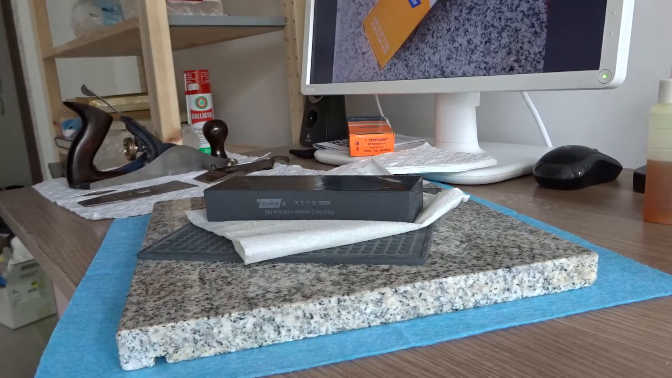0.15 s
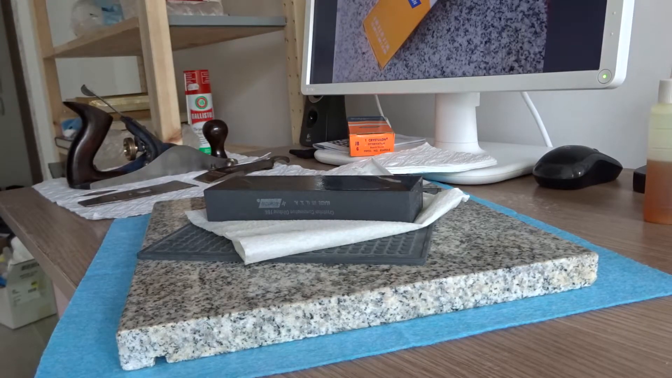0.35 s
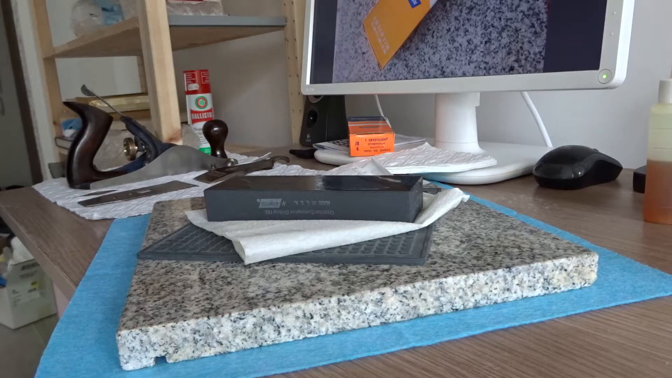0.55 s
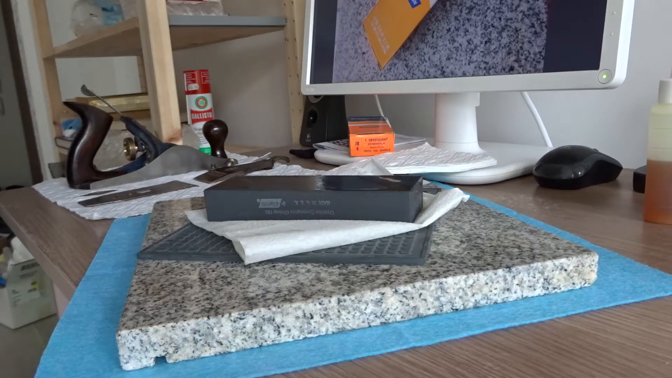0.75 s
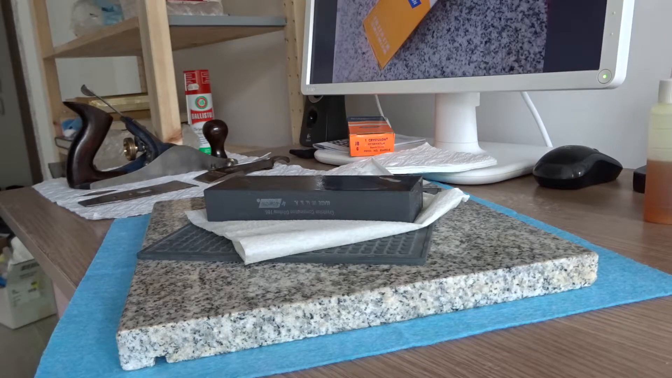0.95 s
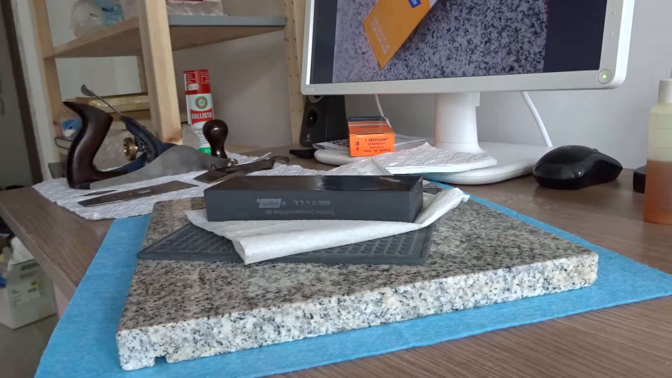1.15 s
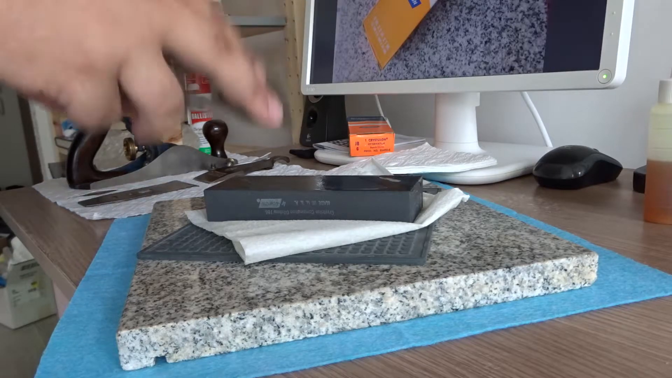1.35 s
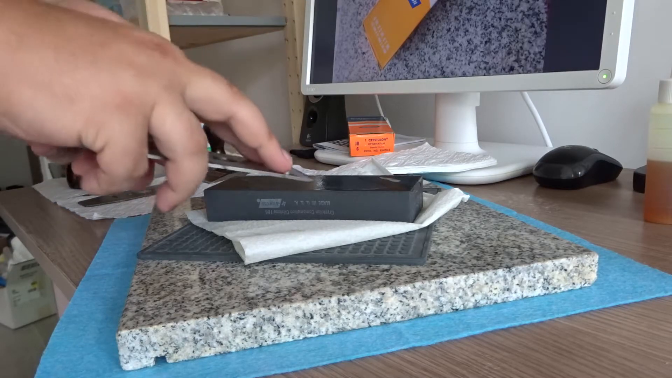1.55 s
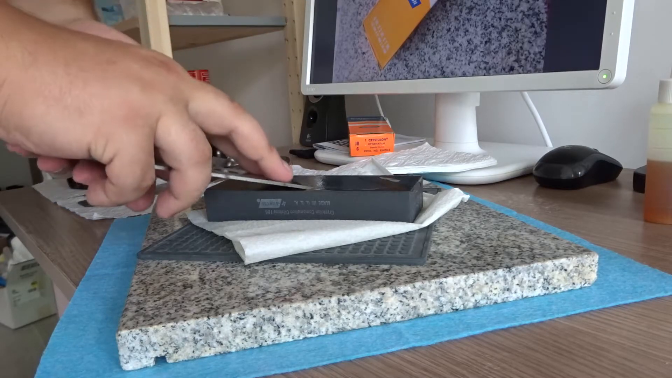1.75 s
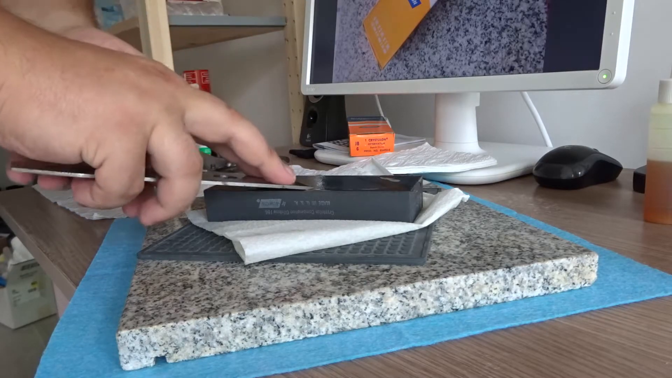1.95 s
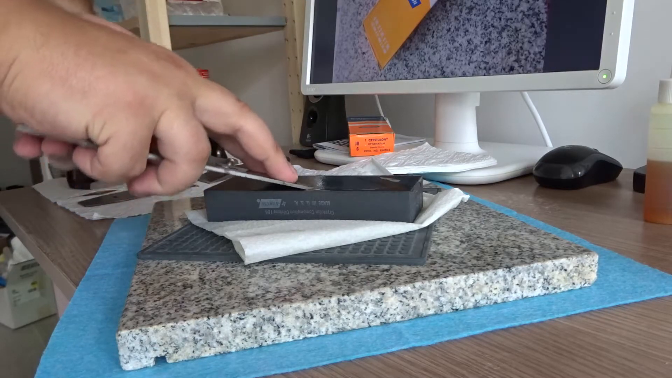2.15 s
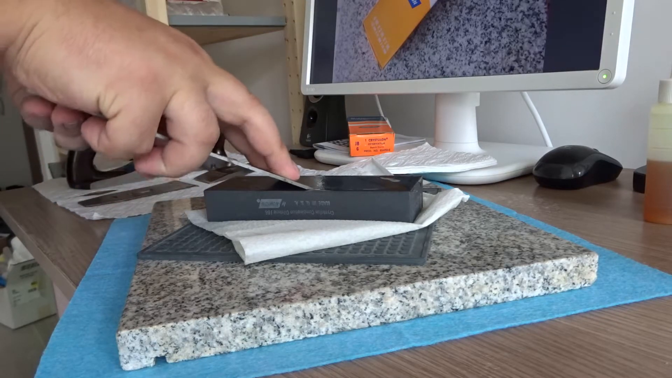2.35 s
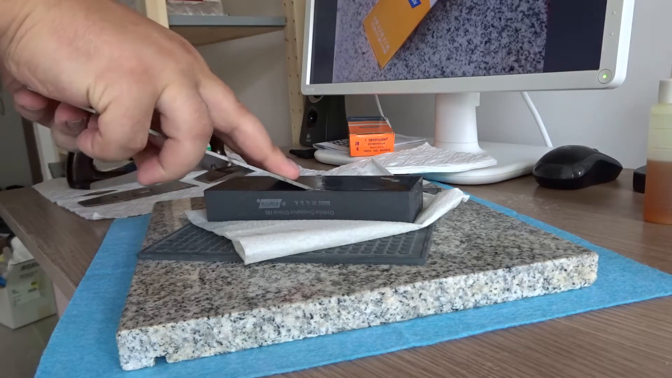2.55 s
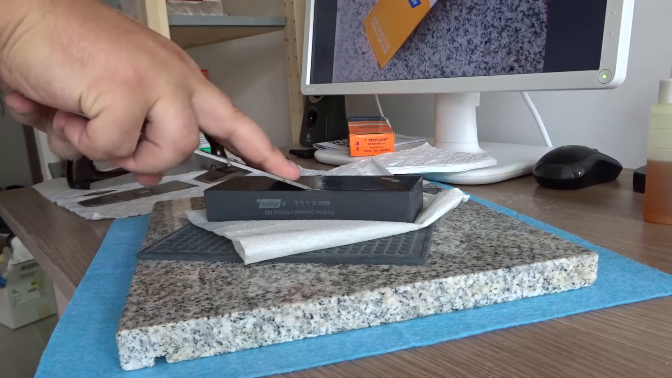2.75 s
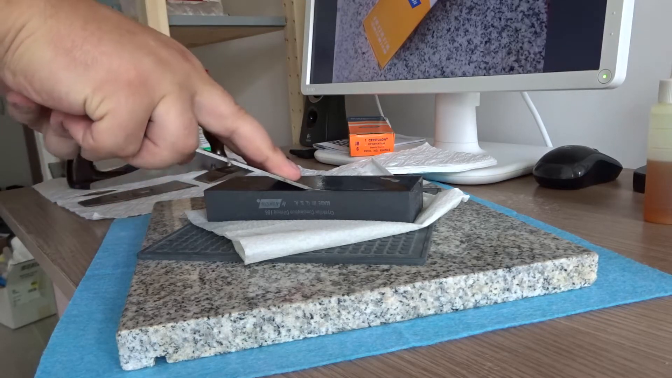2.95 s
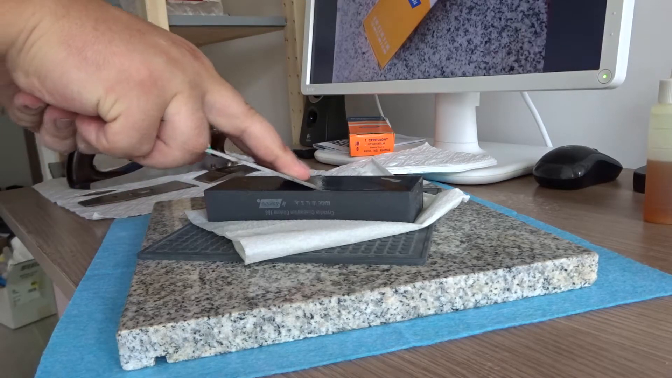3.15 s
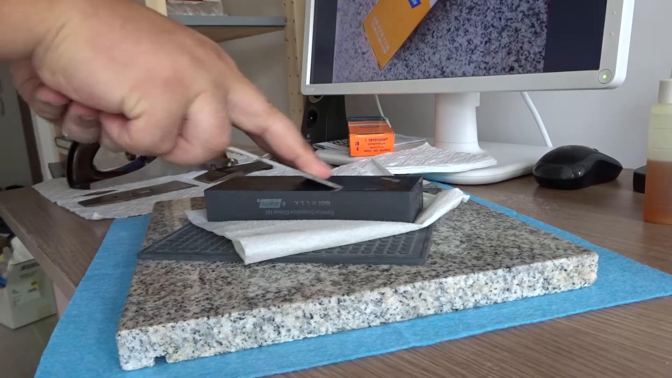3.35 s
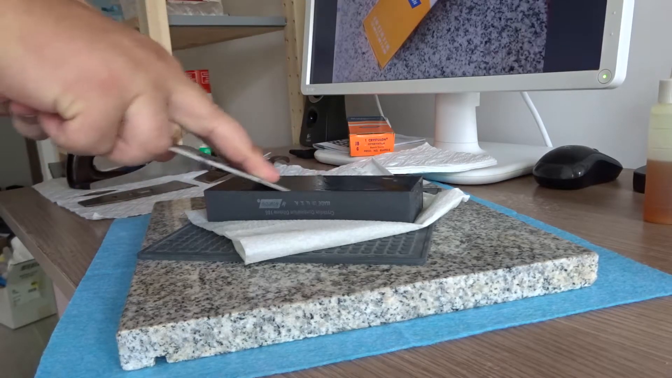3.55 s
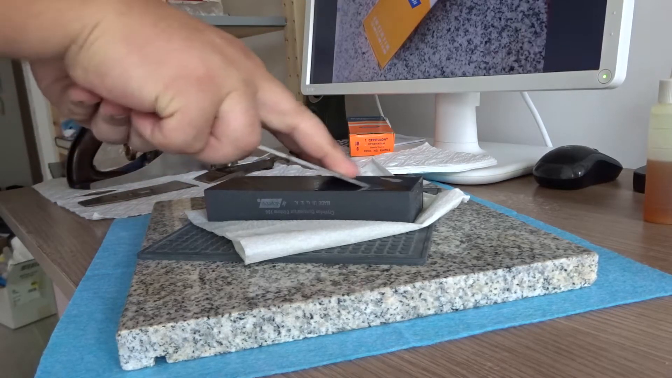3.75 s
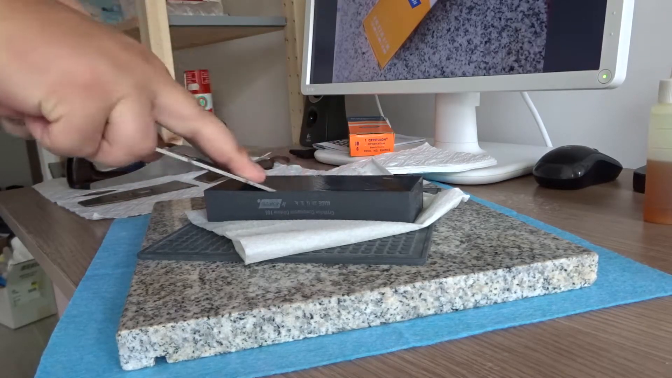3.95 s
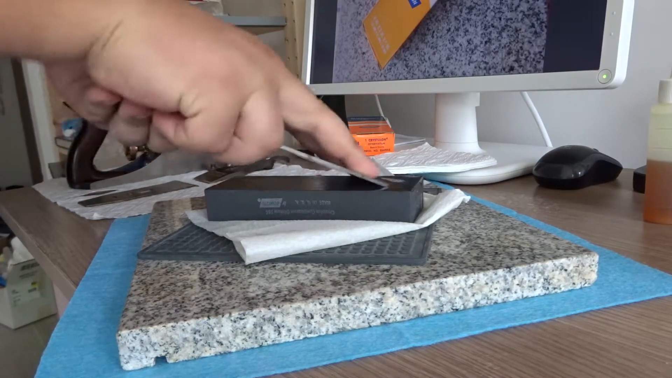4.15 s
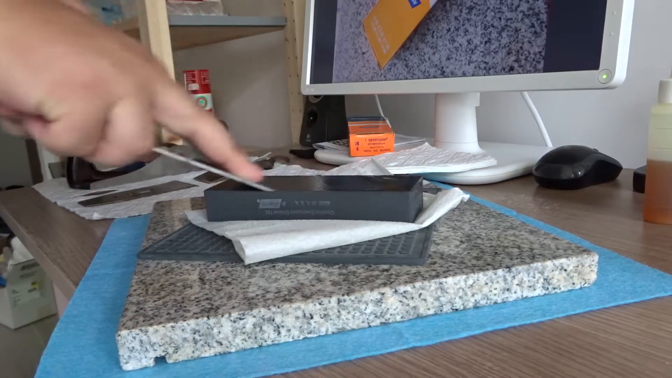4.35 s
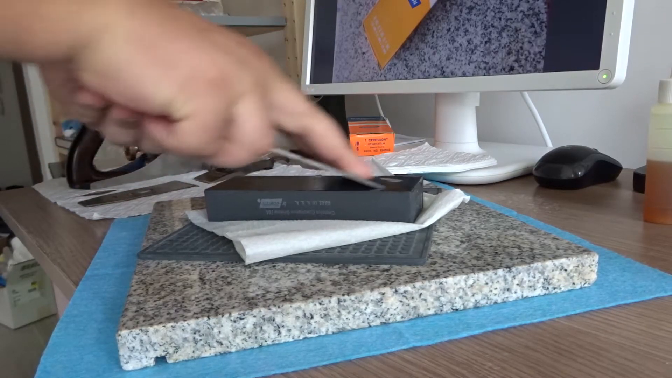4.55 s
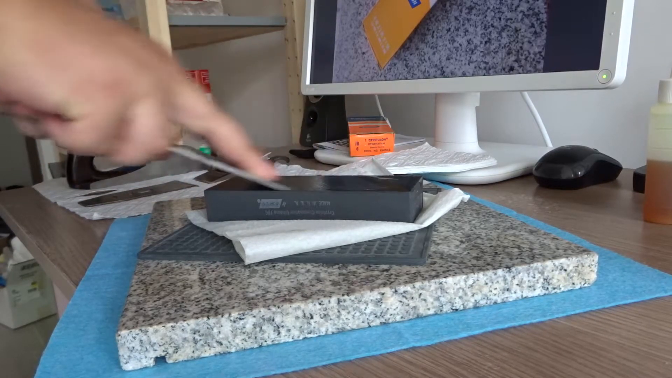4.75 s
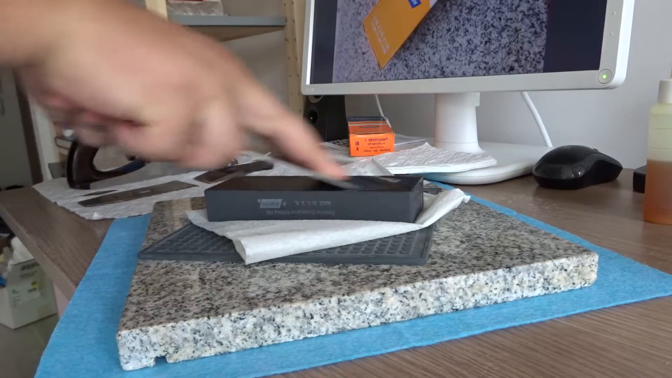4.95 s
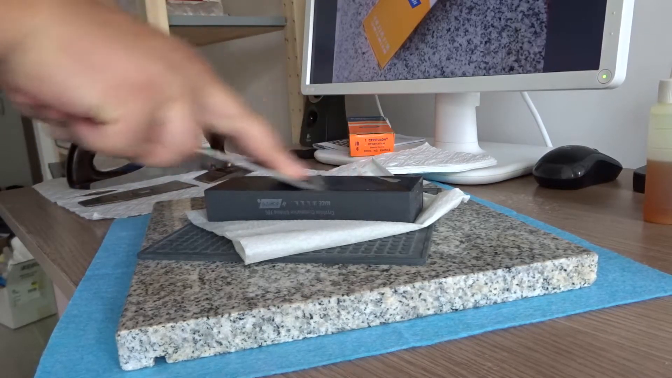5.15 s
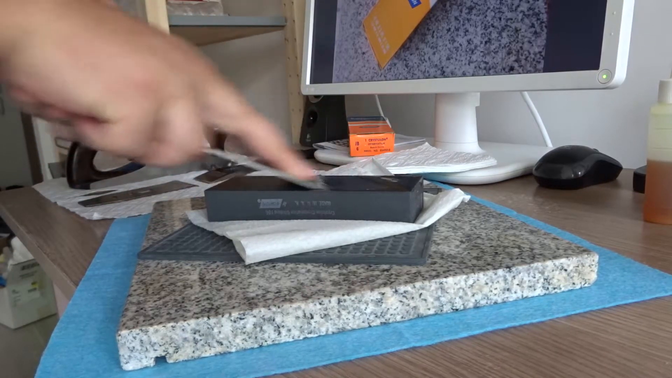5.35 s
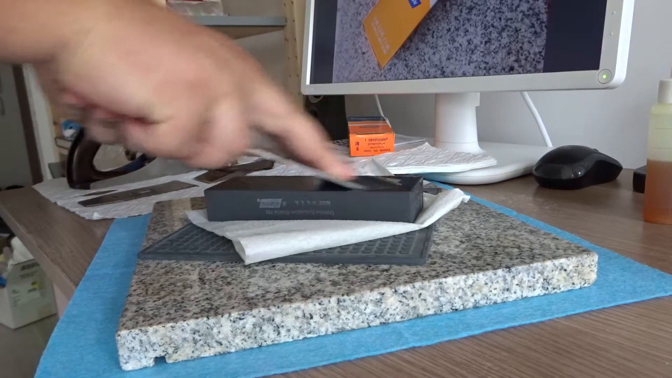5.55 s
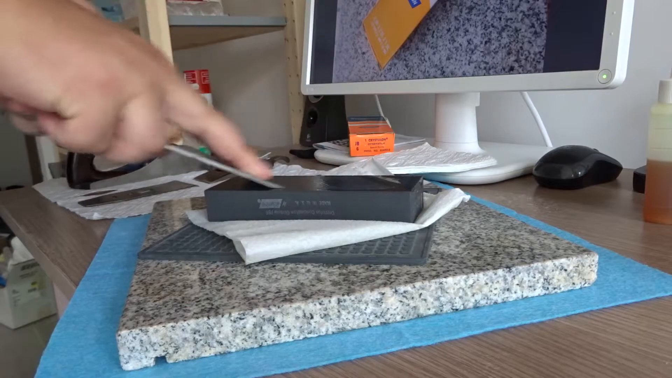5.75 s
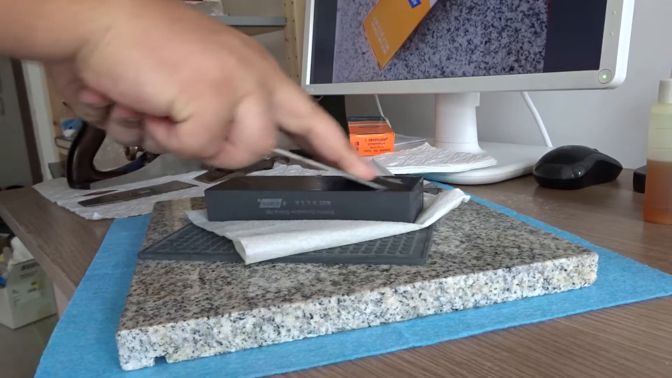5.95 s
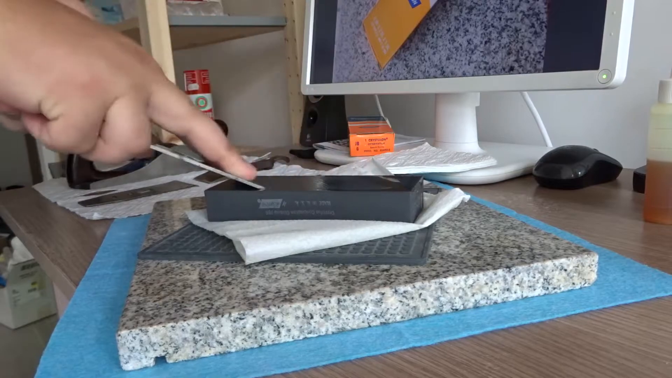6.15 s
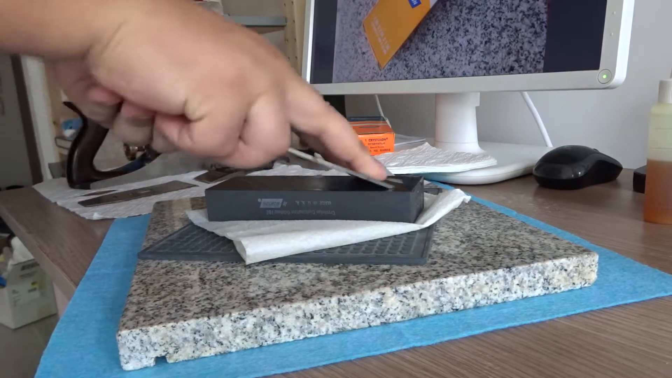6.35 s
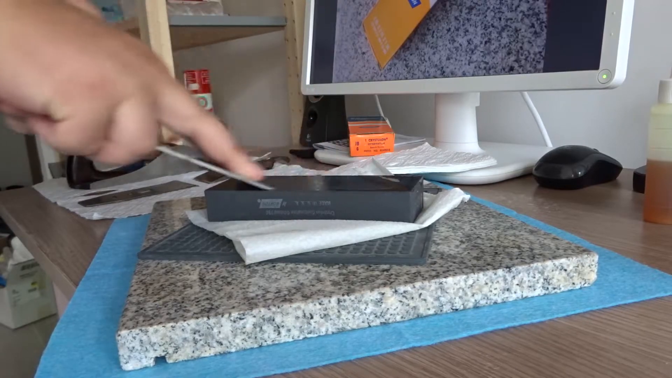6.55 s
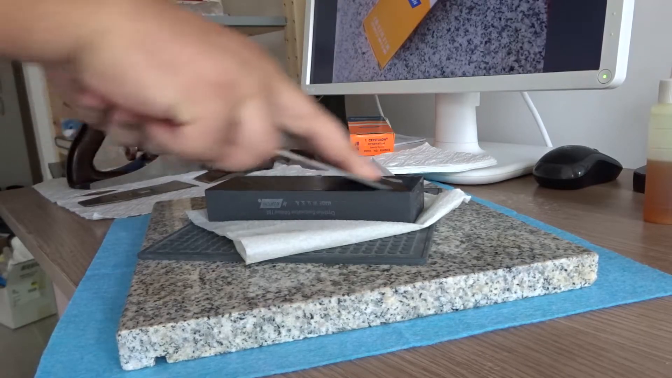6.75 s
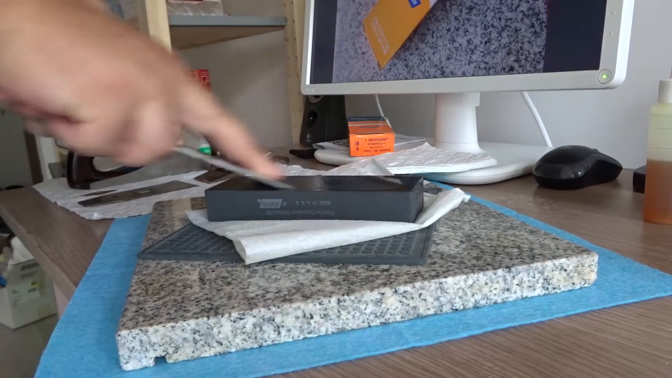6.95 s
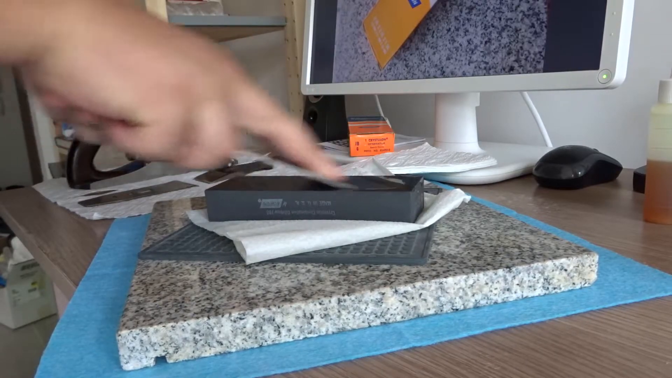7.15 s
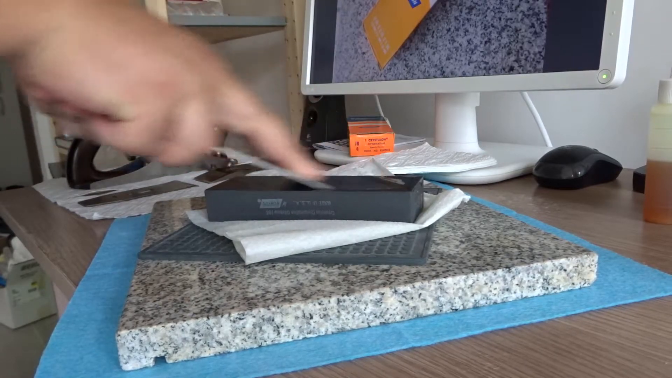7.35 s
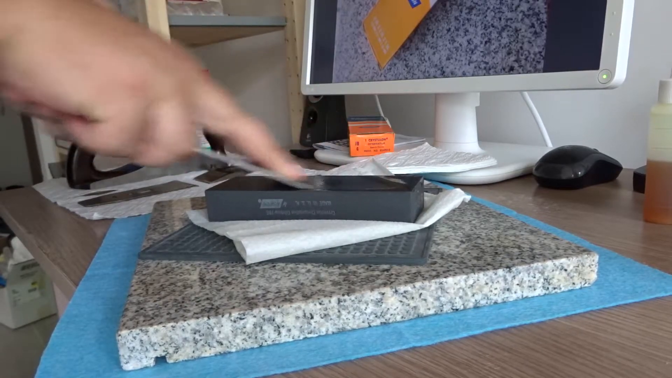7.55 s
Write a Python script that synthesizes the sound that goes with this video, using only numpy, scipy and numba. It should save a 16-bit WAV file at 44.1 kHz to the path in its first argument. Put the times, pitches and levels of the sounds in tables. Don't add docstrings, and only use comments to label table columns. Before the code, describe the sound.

Close microphone at a desk in a small, slightly echoing room. Low hum first, with faint ringing metal rattles in the background. A plane blade lands on a sharpening stone with a short dry clack, followed by scattered crisp ticks and faint scratches. After a sharper tick, fast even rasping takes over: a dense, steely hiss, alternating slightly between outward and return strokes, over soft wooden rumbling, continuing to the end.

```python
import sys
import numpy as np
from scipy import signal
from scipy.fft import rfft, irfft
from scipy.io import wavfile
from scipy.ndimage import uniform_filter1d
from numba import njit

SR = 44100
rng = np.random.default_rng(int(sys.argv[2]) if len(sys.argv) > 2 else 0)


def boost(x):
    u = np.asarray(x, float) / 20
    return 10 ** u


def bounce(signal):
    frames = np.transpose(np.atleast_2d(signal))
    limited = np.clip(frames, -1, 1)
    pcm = np.round(limited * 32767).astype(np.int16)
    wavfile.write(sys.argv[1], SR, pcm)


N = 334719

LOOSE_HZ = [1150, 2735, 3300, 4150, 5620, 5820, 6360, 7820, 10300, 10950, 11800, 13000]
# [level/dB, time to fall 60 dB/s]
LOOSE_RING = [(-32, 0.11), (-2.5, 0.069), (-36, 0.033), (-0.5, 0.057), (-13, 0.12), (-1.5, 0.049),
              (-9, 0.03), (-10, 0.05), (-19, 0.035), (-11, .03), (-21, .04), (-9.5, .04)]
# [t/s, dip/dB, slowing/s]
TURNS = [(3.326, -7, 0.019), (3.56, -10, 0.028), (3.771, -9, 0.021), (3.991, -7, 0.028), (4.2, -7.5, 0.025),
         (4.433, -4.5, 0.048), (4.638, -6, 0.03), (4.869, -4.5, 0.043), (5.074, -4.5, 0.032),
         (5.297, -4, 0.031), (5.512, -3, 0.018), (5.741, -5.5, 0.026), (5.963, -4, 0.023),
         (6.186, -5.5, 0.035), (6.404, -5, 0.021), (6.631, -3.5, 0.051), (6.842, -4, 0.019),
         (7.07, -4.5, 0.041), (7.28, -4, 0.027), (7.518, -4, 0.062)]


def rms_one(x):
    return x / np.sqrt(np.mean(x ** 2) + 1e-20)


def in_time(rows, before=None):
    s, *columns = np.transpose(rows)
    return [np.interp(np.arange(N) / SR, s, c, before) for c in columns]


def coloured(x, points):
    hz, db = np.transpose(points)
    grid = np.arange(len(x) // 2 + 1) * SR / len(x) + 1
    gain = boost(np.interp(np.log(grid), np.log(hz), db))
    return rms_one(irfft(rfft(x) * gain, len(x)))


def drift(rate):
    r = np.exp(-80 * np.pi * rate / SR)
    slow = signal.lfilter([1], [1, -2 * r, r * r], rng.standard_normal(N // 40 + 2002))[2000:]
    return np.interp(np.arange(N) / 40, np.arange(len(slow)), rms_one(slow))


def above(x, hz):
    return signal.sosfilt(signal.butter(2, hz, "high", fs=SR, output="sos"), x)


def between(x, low_hz, high_hz):
    return signal.sosfilt(signal.butter(2, [low_hz, high_hz], "band", fs=SR, output="sos"), x)


def narrow(x, hz, width):
    return signal.lfilter(*signal.iirpeak(hz, hz / width, fs=SR), x)


def split(x, hz):
    grid = np.arange(len(x) // 2 + 1) * SR / len(x)
    share = 1 / (1 + (grid / hz) ** 6)
    spectrum = rfft(x)
    return rms_one(irfft(spectrum * share, len(x))), rms_one(irfft(spectrum * (1 - share), len(x)))


@njit
def swaying(x, cosine, r):
    y = np.zeros(len(x))
    for i in range(2, len(x)):
        y[i] = (1 - r * r) / 2 * (x[i] - x[i - 2]) + 2 * r * cosine[i] * y[i - 1] - r * r * y[i - 2]
    return y


def resonances(x, peaks, sway, bends=None, place=0, patchy_db=0, feed_db=None):
    out = 0
    for k, (hz, width, db) in enumerate(peaks):
        bend = bends[k] * place if bends else 0
        centre = hz * (1 + sway * drift(7.4) + bend)
        gain = (-1) ** k * boost(db + patchy_db * drift(6.7) if patchy_db else db)
        if feed_db:
            gain = gain * boost(feed_db[k])
        out = out + gain * swaying(x, np.cos(2 * np.pi * centre / SR), np.exp(-np.pi * width / SR))
    return out


def ring(clicks, hz, t60):
    r, w = boost(-60 / (t60 * SR)), 2 * np.pi * hz / SR
    return signal.lfilter([0, np.sin(w)], [1, -2 * r * np.cos(w), r * r], clicks)


def burst(s, db, t60):
    t = np.arange(N) / SR - s
    return boost(db - 60 * np.clip(t, 0, 9) / t60) * (t >= 0)


def hum():
    # [f/Hz, level per Hz/dB]
    air_colour = [(29, -59), (50, -6.5), (203, -4), (240, 0), (271, -5), (362, -7), (495, -9), (545, -8),
                  (880, -14), (990, -20), (1330, -23), (3850, -34), (4450, -35.5), (6090, -43),
                  (9870, -41.5), (16000, -44)]
    # [f/Hz, level per Hz/dB]
    side_colour = [(35, -45), (60, -15.5), (417, -4), (732, -5.5), (842, 0.5), (1310, -9.5), (1740, -10.5),
                   (3500, -20.5), (4030, -22), (4420, -25), (5590, -31), (13000, -38), (16000, -75)]
    # [f/Hz, width/Hz, level/dB]
    standing_waves = [(76.5, 5.5, -2.5), (123.2, 4.4, -3), (202, 8.3, -9), (305, 10, -1), (364, 8.4, -6.5),
                      (531, 10, -1.5), (639, 15, -2), (855, 19, -9)]
    # [t/s, level/dB]
    murmur = [(0.0, -49.5), (0.27, -53.5), (0.44, -46), (0.55, -50.5), (1.85, -51), (2.07, -49.5),
              (3.08, -51.5), (3.66, -46.5), (3.93, -51), (4.08, -46), (4.18, -51), (5.07, -50),
              (5.24, -56.5), (5.56, -48), (5.58, -54.5), (6.24, -46), (6.49, -51.5), (7.59, -48.5)]
    # [f/Hz, level/dB]
    whines = [(9566, -79), (15628, -87)]
    mid = coloured(rng.standard_normal(N), air_colour)
    waves = resonances(rng.standard_normal(N), standing_waves, sway=0.006, patchy_db=2.0)
    mid = mid + boost(-9) * rms_one(waves)
    low = mid - above(mid, 1400)
    mid = mid + low * (boost(in_time(murmur)[0] + 47.5) - 1)
    side = boost(-57.0) * coloured(rng.standard_normal(N), side_colour)
    t = np.arange(N) / SR
    whine = sum(boost(db + 6.0 + 3.8 * drift(16.0)) * np.sin(2 * np.pi * hz * t) for hz, db in whines)
    mains_hz, mains_db = 49.0, -90
    whine += boost(mains_db + 1.6 * drift(1.2)) * np.sin(2 * np.pi * mains_hz * t)
    return boost(-45.5) * mid + whine + side * np.array([[1], [-1]])


def clanks():
    # [t/s, level/dB]
    knocks = [
        (0.001, -41),
        (0.686, -34),
        (1.803, -21),
        (2.874, -27.5),
    ]
    metal_hz = [2528, 3503, 4368, 4965, 5090, 6455, 7020, 7542, 8086, 9071, 9990, 10440, 10860, 11480,
                12530, 12715, 14790, 15630, 2425, 3428, 4300]
    # [time to fall 60 dB/s, then level in each of the four knocks/dB]
    metal_modes = [(1.4, -13, -18, -31, -17), (1.36, -3, 3, -15, -4.5), (2.2, -4.5, -1.5, -14, -16),
                   (0.84, -23, -26, -18, -30), (0.46, -25, -28, -22, -24), (0.89, -10, -23, -33, -35),
                   (1.8, -14, -11, -18, -15), (1.6, -24, -14, -17.5, -11), (1.1, -35, -13, -30, -25),
                   (1.5, -32, -20, -19, -18), (0.97, -32, -17, -25, -28), (0.93, -32, -11, -20, -22),
                   (0.91, -32, -11, -26, -28), (0.67, -34, -18, -20, -15), (0.73, -36, -8, -24, -19),
                   (0.66, -36, -2, -18, -7), (.3, -36, -10, -18, -26), (.2, -36, -11, -28, -12),
                   (0.93, -11, -18, -26, -22), (0.97, -18, -24, -24, -21), (0.5, -20, -21, -24, -24)]
    # [t/s, f/Hz, level/dB]
    rocks = [(.075, 4323, -34), (.74, 2528, -42), (0.891, 2425, -42), (.9, 5090, -47), (1.01, 3503, -60),
             (1.88, 3503, -39), (1.94, 3503, -46), (1.955, 4368, -33), (2.06, 4350, -46), (2.93, 2528, -45),
             (3.0, 2528, -46), (2.9, 4420, -38), (2.965, 4320, -35), (3.005, 4350, -39), (3.005, 3503, -34),
             (3.045, 2410, -45.5), (3.054, 4340, -39)]
    # [f/Hz, level per Hz/dB]
    jangle_colour = [(1200, -18), (2500, -9.5), (4400, -3.5), (7000, -5), (11000, 14), (15500, 10)]
    # [t/s, level/dB, time to fall 60 dB/s, treble/dB]
    jangles = [
        (0.001, -37.5, 0.87, -2),
        (0.686, -37, 0.98, 7),
        (0.84, -44.5, 0.91, -16),
        (1.803, -42, .5, 8),
        (2.874, -50, .9, 5),
    ]
    s, db = np.transpose(knocks)
    at, out = (s * SR).astype(int), 0
    smear = 1 - sum(burst(start, -3.0, 0.15) for start in s)
    for hz, (t60, *mode_db) in zip(metal_hz, metal_modes):
        clicks = np.full(N, 1e-18)
        clicks[at] = boost(db + mode_db)
        for rock_s, rock_hz, rock_db in rocks:
            clicks[int(rock_s * SR)] += boost(rock_db) * (abs(rock_hz / hz - 1) < 0.01)
        stands_alone = 3000 < hz < 6000
        flutter, echo_loss = (0.4, 0.45) if stands_alone else (0.9, 0.7)
        wobble = flutter * drift(25.0 + hz / 150.0) - echo_loss
        out = out + ring(clicks, hz, t60) * (1 + wobble * smear)
    out = out * (1 + sum(burst(start, 0.34, 0.5) for start in s))
    low, high = split(coloured(rng.standard_normal(N), jangle_colour), 4900)
    swell = int(0.026 * SR)
    for start, level_db, t60, treble_db in jangles:
        envelope = uniform_filter1d(burst(start, level_db, t60), swell, origin=int(0.026 * SR - 1) // 2)
        out = out + envelope * (low + boost(treble_db - 12.0) * high)
    return out


def ticks():
    # [t/s, level/dB, brightness/dB, strongest f/Hz]
    touches = [(0.0444, -52, -7, 4360), (1.76, -30.5, -9, 4150), (1.768, -37, 1, 3300),
               (1.895, -43, 4, 4380), (1.916, -38, 5, 4150), (2.0853, -53, 8, 7820), (2.106, -46, 8, 10950),
               (2.138, -40, 1.5, 2735), (2.165, -33, 2, 6300), (2.2293, -42, 9, 11800),
               (2.248, -40, 7, 11000), (2.2594, -42, 9, 11800), (2.2746, -44, 12, 11000),
               (2.2995, -47, 8, 11000), (2.31, -48, 12, 10500), (2.32, -44, 3, 9480),
               (2.366, -50, 12, 11800), (2.38, -43, 12, 11800), (2.3964, -49, 3, 6240),
               (2.4048, -36, 5, 5620), (2.4256, -35.5, 3, 10300), (2.4411, -35, 0.5, 10300),
               (2.4786, -44, 7, 4130), (2.7036, -50, 8, 11800), (2.72, -39, 2.5, 5900),
               (2.735, -39, 7, 11800), (2.756, -40.5, 4, 10950), (2.7739, -31, 6, 5820),
               (2.783, -42, 6, 4150), (3.0537, -52, 3, 11000), (3.072, -54, 9, 11000),
               (3.0983, -47, 10, 13000), (3.1124, -43, 8, 11800), (3.133, -45, 8, 11800),
               (3.153, -42, 10, 11800), (3.255, -27.5, -1, 4150), (3.366, -21, 6, 5900)]
    white, out = rng.standard_normal(N), np.zeros(N)
    peaks = [(hz, 250.0, db) for hz, (db, t60) in zip(LOOSE_HZ, LOOSE_RING)]
    steel = resonances(white, peaks, sway=0.002)
    low, high = split(above(white, 1800) + 7.0 * steel, 7500)
    strengths = np.zeros((len(LOOSE_HZ), N)) + 1e-18
    scatter = rng.standard_normal((len(touches), len(LOOSE_HZ)))
    t = np.arange(SR // 10) / SR
    crack_t60_s, rise_s = 0.027, 0.00016
    crack = boost(-60 * t / crack_t60_s) * np.minimum(t / rise_s, 1)
    loose_hz = np.array(LOOSE_HZ)
    for (s, db, bright_db, hz), chance in zip(touches, scatter):
        at, low_db, high_db = int(s * SR), db - max(bright_db, 0), db + min(bright_db, 0)
        span = slice(at, at + len(crack))
        hz = min(LOOSE_HZ, key=lambda mode: abs(mode - hz))
        own = rms_one(narrow(white[span], hz, 120.0))
        colour = boost(low_db + 1.0) * low[span] + boost(high_db + 8.0) * high[span] + boost(db + 4.5) * own
        out[span] += crack * colour
        out[at:at + 3] += boost(db - -2) * np.array([1, -2, 1])
        mode_db = np.where(loose_hz < 7000, low_db, high_db)
        strengths[:, at] = boost(mode_db + 2.1 * chance + 4.3 * (loose_hz == hz))
    for clicks, hz, (db, t60) in zip(strengths, LOOSE_HZ, LOOSE_RING):
        out = out + boost(db - 2) * ring(clicks, hz, t60)
    return out


def leaning(jolts, rise, fall, rest_db):
    t = np.arange(0, N, 64) / SR
    level_db = rest_db + 10 * (t > TURNS[0][0])
    for s, db in jolts:
        level_db = np.maximum(level_db, db - np.abs(t - s) * np.where(t < s, rise, fall))
    return np.interp(np.arange(N) / SR, t, level_db)


def desk():
    # [f/Hz, width/Hz, level/dB]
    top_modes = [(191.2, 9.5, 10.5), (262, 28.6, 1)]
    # [f/Hz, width/Hz, level/dB]
    frame_modes = [(124, 14.5, 0)]
    # [t/s, level/dB]
    top_jolts = [(.42, -46), (.74, -50), (1.12, -60), (1.58, -36.5), (1.75, -38.5), (2.16, -53),
                 (2.41, -43), (2.76, -41.5), (2.96, -50), (3.3, -38.5), (3.57, -40), (3.7, -36), (3.8, -46),
                 (3.93, -39.5), (4.1, -43), (4.2, -42.5), (4.54, -35.5), (4.84, -47), (4.97, -38),
                 (5.24, -39), (5.52, -39.5), (5.9, -40), (6.02, -35.5), (6.17, -35.5), (6.28, -38),
                 (6.41, -35.5), (6.58, -39.5), (6.83, -39.5), (7.12, -47), (7.33, -52), (7.59, -34)]
    # [t/s, level/dB]
    frame_jolts = [(.38, -54), (.59, -50), (.97, -44.5), (1.69, -49), (2.01, -47.5), (2.22, -53),
                   (2.41, -50), (2.79, -46), (3.23, -39), (3.67, -46), (4.03, -50), (4.2, -49), (4.84, -40),
                   (5.05, -42), (5.52, -44), (6.02, -34.5), (6.38, -45.5), (6.83, -42), (7.02, -56),
                   (7.29, -43), (7.49, -41)]
    leaned_on = np.clip((np.arange(N) / SR - TURNS[0][0]) / 1.1, 0, 1)
    top = resonances(rng.standard_normal(N), top_modes, sway=0.0063, bends=[0.028, 0], place=leaned_on)
    frame = resonances(rng.standard_normal(N), frame_modes, sway=0.0045, bends=[0.045], place=leaned_on)
    top_db = leaning(top_jolts, rise=270, fall=107, rest_db=-57.5) - 1.0
    frame_db = leaning(frame_jolts, rise=180, fall=160, rest_db=-63)
    return boost(top_db) * rms_one(top) + boost(frame_db) * rms_one(frame)


def grit(per_s, spread):
    sizes = boost(spread * np.minimum(rng.exponential(1, N), 4)) * rng.choice([-1, 1], N)
    return rms_one(sizes * (rng.random(N) < per_s / SR))


def shuffle():
    # [t/s, level/dB, brightness/dB]
    slide = [
        (1.7, -85, 20),
        (1.808, -35, -25),
        (1.93, -32.5, -21),
        (2.03, -41.5, -6),
        (2.334, -43, 11),
        (2.534, -46, 9),
        (2.68, -54, 10),
        (2.772, -62, 4),
        (2.904, -43, -3),
        (3.1, -43.5, 0),
    ]
    low_db, bright_db = in_time(slide + [(3.2, -90, 0)], before=-120)
    grains = grit(per_s=4500.0, spread=2.3)
    peaks = [(hz, 1.2 / t60 + 30, db) for hz, (db, t60) in zip(LOOSE_HZ, LOOSE_RING)]
    loose = resonances(grains, peaks, sway=0.0033)
    low = rms_one(between(grains + 2.0 * loose, 1800, 7000))
    high = rms_one(above(grains + 5.0 * loose, 11000))
    return boost(low_db - 10.0) * low + boost(low_db + bright_db - 25.0) * high


def landing():
    # [f/Hz, level/dB, time to fall 60 dB/s]
    stone = [(1150, -41, 0.08), (1410, -41, 0.07), (1630, -41, 0.08), (2060, -42, 0.1), (3310, -32, 0.065),
             (5200, -33, 0.076)]
    click = np.full(N, 1e-18)
    click[int(1.759 * SR)] = 1
    return sum(boost(db) * ring(click, hz, t60) for hz, db, t60 in stone)


def pressed_blade(place, pulling):
    pressed_hz = [1490, 2340, 2460, 2570, 2735, 3830, 4070, 5100, 5520, 7620, 9000, 9550, 10250, 10600,
                  12850, 13180, 15100, 3620, 1630, 6500, 8250, 11500, 12450, 1468, 5410, 3800, 12930, 10480,
                  5040]
    # [width/Hz, level/dB]
    pressed = [(170, -4.5), (59.6, -8), (60, -1.5), (71, -2.5), (40, -2), (150, -3), (59, -3), (148.15, -4),
               (186, -1), (80, 0.5), (380, 2), (120, -8), (90, -6), (85, -8), (297, -3.5), (330, 5.5),
               (500, 0), (129, -5), (89.5, -14.5), (150, -15), (150, -15), (100, -10), (150, -13),
               (24.8, -1), (45, -2.5), (40, -6.5), (60, 1), (40, -4), (40, -3.5)]
    pressed_bend = [0.0045, 0.0044, 0.0041, 0.0027, 0.0013, 0.042, 0.0025, 0.036, 0.027, 0.0018, 0.03,
                    0.0072, 0.0036, 0.0037, 0.013, 0.0081, .004, 0.0048, 0.0055, .01, .01, .005, .01,
                    0.0016, 0.0034, 0.0024, .002, .002, .003]
    # [gain towards the far end/dB, gain on the stroke back/dB]
    pressed_feed = [(-2, 0), (-2.5, 0), (2, 1), (-4, 0), (1.5, 0.5), (-3.5, 1.5), (-1, 2.5), (-7, 3),
                    (3, 3), (4, -1.5), (0, -1), (1, 11), (-18, -5), (4, -10), (2, -1), (-3.5, -3),
                    (-0.5, -1.5), (4, -1), (7, 1.5), (3, 8), (-14, -1.5), (3, -1), (3, 3), (-4.5, -1.5),
                    (-3, -5.5), (9, 2.5), (.1, 7), (.1, 0), (1, 2)]
    peaks = [(hz, *mode) for hz, mode in zip(pressed_hz, pressed)]
    feed_db = [far_db * place + back_db * (2 * pulling - 1) for far_db, back_db in pressed_feed]
    grains = grit(per_s=14000.0, spread=2.65)
    return rms_one(resonances(grains, peaks, sway=0.0034, bends=pressed_bend, place=place,
                              patchy_db=2.0, feed_db=feed_db))


def rasp():
    # [t/s, scratch level/dB, brightness/dB]
    weight = [
        (3.04, -56, -2),
        (3.12, -48.5, -3),
        (3.18, -35.5, 3),
        (3.3, -28, 0),
        (3.38, -20.5, -1.5),
        (3.47, -22, -0.5),
        (4.3, -23, 2.5),
        (7.59, -24, 4.5),
    ]
    # [f/Hz, level per Hz/dB]
    grit_colour = [(250, -23), (400, -43), (750, -16), (1000, -23.5), (1800, -15), (2200, -8.5),
                   (3250, -10.5), (4600, -3), (6100, 1), (9000, 1.5), (11900, 3), (12900, 4.5),
                   (13900, -1.5), (15800, -4)]
    speeding_up_s = [0.012, 0.031]
    dull_share = [0.62, 0.21]
    top_share = [1.75, 1.45]
    # [f/Hz, width/Hz, share lost]
    dead_spots = [(1785, 200, 0.68), (6060, 260, 0.38)]
    low_db, bright_db = in_time(weight, before=-120)
    t, turns = np.arange(N) / SR, np.array(TURNS)[:, 0]
    pulling = np.interp(t, (turns[1:] + turns[:-1]) / 2, np.arange(len(turns) - 1) % 2 == 0)
    low_db = low_db - 0.94 * pulling
    high_db = low_db + bright_db + 3 * pulling
    coarse, low_dip_db, high_dip_db, top_dip_db = t[::32], 0, 0, 0
    for k, (s, dip_db, slowing) in enumerate(TURNS):
        speeding = speeding_up_s[k % 2] if k else 0.041
        halt = 2.1 * np.exp(-(np.abs(coarse - s) / np.where(coarse < s, slowing, speeding)) ** 1.33)
        share = dull_share[k % 2] + 0.75 * np.exp(-(s - turns[0]) / 0.71)
        low_dip_db = low_dip_db + share * dip_db * halt
        high_dip_db = high_dip_db + dip_db * halt
        top_dip_db = top_dip_db + (top_share[k % 2] - 1) * dip_db * halt
    low_db = low_db + np.interp(t, coarse, low_dip_db)
    high_db = high_db + np.interp(t, coarse, high_dip_db)
    scratch = coloured(grit(per_s=14000.0, spread=3.9), grit_colour)
    place = np.interp(t, turns, (-1) ** np.arange(len(TURNS)))
    modes = pressed_blade(place, pulling)
    blade = scratch + 0.72 * above(above(modes, 1140), 1140)
    for hz, width, lost in dead_spots:
        blade = blade - lost * narrow(blade, hz, width)
    low, high = split(blade, 5740)
    top = signal.sosfiltfilt(signal.butter(2, 11500, "high", fs=SR, output="sos"), high)
    high = high + top * (boost(np.interp(t, coarse, top_dip_db)) - 1)
    unsteady = boost(0.35 * drift(40.0))
    return unsteady * (boost(low_db) * low + boost(high_db) * high)


def room(x, hop=8192):
    # [f/Hz, time to fall 60 dB/s, level/dB, left-right difference/dB]
    tail_table = [(500, 1, 1.5, -15.5), (4020, 1, 1, -8.5), (9000, 0.71, 2, -10), (14000, 0.27, 1, -12)]
    t, edges, bands, decays = np.arange(30000) / SR, np.geomspace(200, 17000, 9), [], []
    hz, *columns = np.transpose(tail_table)
    for low, high in zip(edges, edges[1:]):
        t60, db, side_db = [np.interp(np.sqrt(low * high), hz, c) for c in columns]
        noise = between(rng.standard_normal((2, 2 * len(t))), low, high)
        bands.append(noise * boost([[db], [db + side_db]]))
        decays.append(boost(-60 * t / t60) * np.minimum(t / 0.0023, 1) / np.sqrt(t60 * SR / 14))
    padded, out = np.pad(x, (hop, 2 * hop)), np.zeros((2, N + 3 * hop + len(t)))
    fade = np.sqrt(np.hanning(2 * hop))
    for i in range(0, N + hop, hop):
        starts = rng.integers(0, len(t), 8)
        tail = sum(band[:, k:k + len(t)] * decay for band, decay, k in zip(bands, decays, starts))
        wet = signal.fftconvolve(padded[None, i:i + 2 * hop] * fade, tail, axes=1)
        out[:, i:i + wet.shape[1]] += wet
    mid, side = out[:, hop:hop + N]
    return mid + side * np.array([[1], [-1]])


def scene():
    rubbing, touches = rasp() + shuffle(), ticks() + landing()
    far = boost(-13.5) * clanks()
    near = boost(-3.5) * (rubbing + touches)
    echoes = room(boost(-9.0) * rubbing + boost(-8.5) * touches + boost(-6) * far)
    return near + far + echoes + desk() + hum()


def top_cut(x):
    return signal.sosfilt(signal.butter(12, 16930, fs=SR, output="sos"), x)


def record(dry):
    cut = signal.sosfilt(signal.ellip(12, 0.5, 70, 15730, fs=SR, output="sos"), dry)
    return top_cut(cut)


dry = scene()
out = record(dry)
bounce(out)
```